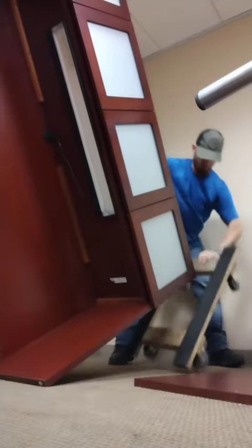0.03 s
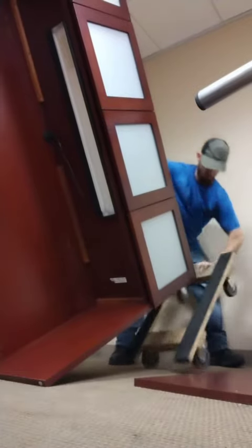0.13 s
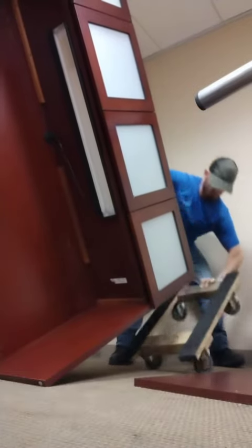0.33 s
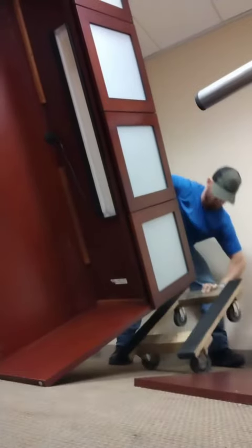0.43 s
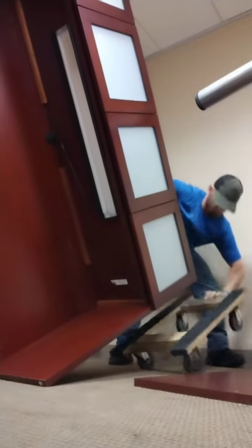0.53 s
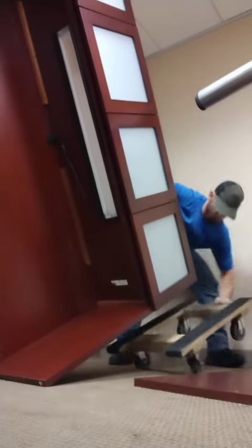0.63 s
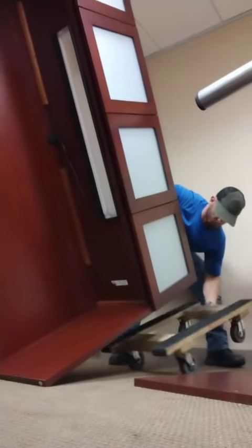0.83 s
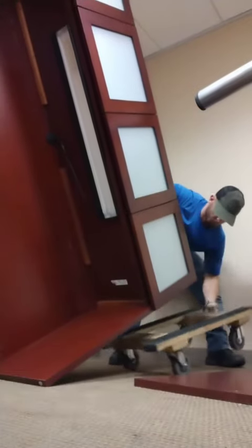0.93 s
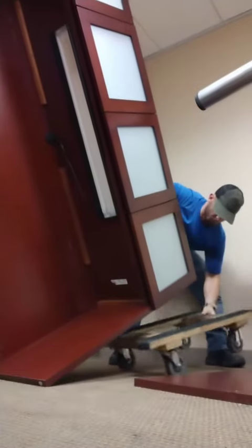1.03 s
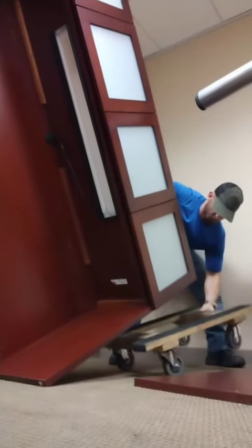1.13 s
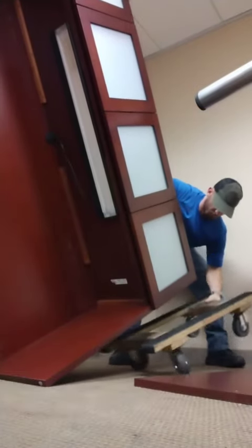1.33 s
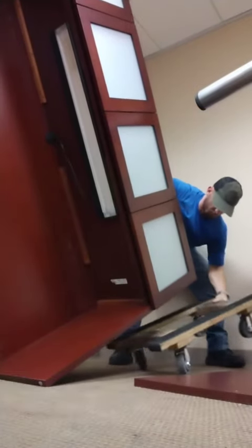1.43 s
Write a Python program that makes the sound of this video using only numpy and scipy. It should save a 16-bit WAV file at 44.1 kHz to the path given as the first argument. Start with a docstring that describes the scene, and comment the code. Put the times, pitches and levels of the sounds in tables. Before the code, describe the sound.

A wooden dolly knocks hollowly against a tall cabinet, ringing its panels and rattling the casters. The wheels land on carpet with soft thumps and a steel click, then scuff faintly, heard from the floor of a quiet office.

```python
"""A carpeted office, heard from one spot on the floor through a single microphone, over quiet ventilation.
A wooden dolly is lowered under a tall wooden cabinet and knocks against it: three hollow blows boom in
the box, ring its panels and shake the casters. The wheels land with soft thumps and a steel click,
then the dolly scuffs over the carpet as it is nudged into place."""
import sys
import numpy as np
from scipy import signal
from scipy.io import wavfile

SR = 44100
rng = np.random.default_rng(int(sys.argv[2]) if len(sys.argv) > 2 else 0)


def wav_record(signal):
    """Record a signal, one row per channel, as 16-bit PCM in the file named by sys.argv[1]."""
    frames = np.transpose(np.atleast_2d(signal))
    bounded = np.clip(frames, -1, 1)
    # unit amplitude maps onto the largest positive 16-bit level
    quanta = np.round(bounded * 32767).astype(np.int16)
    wavfile.write(sys.argv[1], SR, quanta)


N = 66150

# Tone colours of ventilation, carpet friction, wood on wood, a landing wheel, loose parts and steel.
# Each row: frequency in Hz, relative level in dB.
AIR_COLOUR = [(25, -16.5), (60, -2.5), (130, 4.5), (220, -6), (550, -10), (1200, -15), (2000, -19.5),
              (4000, -24), (7500, -28)]
CARPET_COLOUR = [(40, -19.5), (140, 0), (260, -2.5), (550, 4.5), (1100, -2), (1700, -10.5), (2600, -15),
                 (4000, -25), (7500, -37.5)]
WOOD_COLOUR = [(35, -50), (80, -24.5), (120, -16), (160, -2), (215, -9), (300, -16.5), (430, -2), (530, -5),
               (720, 1.5), (1150, 0), (1650, -11.5), (2400, -16), (4000, -29.5), (7500, -52)]
THUMP_COLOUR = [(35, -36), (78, -5.5), (105, -5.5), (135, 0), (220, -3), (420, -2), (800, -20.5),
                (2000, -32.5), (7000, -60)]
RATTLE_COLOUR = [(100, -23.5), (400, -0.5), (900, -2.5), (1650, -6), (2000, -1.5), (2300, 2), (2700, -5),
                 (3200, -12), (4000, -10.5), (4700, -22), (7500, -25)]
STEEL_COLOUR = [(300, -2.5), (1500, -4.5), (3000, -4), (4500, -0.5), (7500, -8.5)]
# The office's reverberation. Each row: frequency in Hz, seconds to fall 60 dB.
ROOM_DECAY = [(70, .6), (200, .54), (500, .48), (1000, .47), (2200, .42), (4000, .28), (7500, .25)]
# Pushes over the carpet. Each row: start, rise and fall in seconds, level in dB, tilt in dB per octave.
CARPET_SCUFFS = [(.03, 0.053, 0.14, -69.5, -0.5), (0.974, 0.029, 0.038, -52, 3),
                 (1.0, .03, 0.19, -69, 13.5), (1.1, .1, .2, -72, -1.5), (1.329, 0.014, 0.11, -62.5, 3),
                 (1.385, 0.035, 0.13, -51.5, -0.5), (1.435, 0.012, 0.058, -53.5, 4)]
# Dolly against cabinet. Each row: start in seconds, level in dB, tilt in dB per octave,
# then boom, panel ring and room in dB, attack in seconds.
WOOD_BLOWS = [(0.1865, 2.5, 0.5, 9, -3, 2.5, 0.0023), (0.2015, -7.5, 3.5, 12, -15.5, 5, 0.00054),
              (0.2328, 18, -2, -10.5, -5, -6.5, 0.0014), (0.2461, 12, 2.5, -1.5, -8.5, -2.5, 0.00033),
              (0.4110, -4, 0, 6.5, 5.5, 9.5, 0.0022), (0.4159, 11, -4.5, -4.5, -4.5, -6.5, 0.00031),
              (0.4250, 2.5, 1, 2.5, -2.5, -4.5, 0.00037), (0.4640, -15, -2, 6.5, 8, 11, 0.0077),
              (0.589, -14.5, -11, -18, 12, 8.5, 0.0049), (0.7658, -14.5, -7.5, -8.5, 4.5, 2.5, 0.00084),
              (0.9666, -22, -7, -8, -11, -10, .003)]
# First reflections off floor, cabinet and wall. Each row: delay at the microphone in seconds, gain.
EARLY_ECHOES = [(.0029, 0.22), (.0060, 0.46), (0.0096, 0.31), (0.014, 0.64)]
# Modes of the cabinet's panels. Each row: frequency in Hz, relative level in dB.
PANEL_MODES = [(153, -7), (178, -9), (214, -6), (398, -7), (439, -5), (616, -2), (694, 0), (772, -1),
               (877, -1), (914, -2), (1027, 0), (1072, 3), (1322, -4), (1392, -2), (1484, -4), (1869, -11)]
# Wheels landing on carpet. Each row: start in seconds, level in dB.
WHEEL_LANDINGS = [(0.207, -14), (0.716, -16.5), (.78, -11.5), (0.826, -16.5), (1.017, -33)]
# Loose dolly parts. Each row: start and length in seconds, level in dB, tilt in dB per octave.
DOLLY_RATTLES = [(0.232, 0.055, -33, 0), (0.443, .075, -28.5, -6), (.55, 0.16, -51.5, -6.5),
                 (.712, 0.054, -39.5, 0.5), (.774, 0.03, -38.5, 10.5)]

PIVOT_HZ, EDGE_HZ = 890, 7650  # tilts turn about the pivot; the treble ends at the edge
ROOM_RISE_S = 0.0049


def amp(db):
    """Decibels to gain."""
    return 10 ** (np.asarray(db) / 20)


def unit(x):
    """Scales to an energy of one."""
    return x / np.sqrt(np.sum(x ** 2) + 1e-20)


def read(points, hz):
    """Reads a table on a log-frequency axis."""
    f, value = np.transpose(points)
    return np.interp(np.log(hz + 1), np.log(f + 1), value)


def add(mix, start_s, sound):
    """Mixes a sound in at a time."""
    part = mix[max(round(start_s * SR), 0):][:len(sound)]
    part += sound[:len(part)]


def cavity(hz, centre_hz=163, width_octaves=.5):
    """Weight 0-1 of the cabinet's low cavity resonance, its boom."""
    return np.exp(-(np.log2((hz + 1) / centre_hz) / width_octaves) ** 2)


def pulse(colour, tilt_db=0, boom_db=0, size=8192):
    """A causal pulse of unit energy with the given colour, tilt and low boom."""
    hz = abs(np.fft.fftfreq(size, 1 / SR))
    octaves = np.log2(np.clip(hz, PIVOT_HZ / 2, EDGE_HZ) / PIVOT_HZ)
    db = read(colour, hz) + tilt_db * octaves + boom_db * cavity(hz)
    minimum_phase = np.exp(np.conj(signal.hilbert(np.log(amp(db)))))
    return unit(np.fft.ifft(minimum_phase).real[:size // 2])


def tail(decays, rise_s):
    """Dense reflections with an even spectrum, each band dying at its own speed."""
    hz, t, bands = signal.stft(rng.standard_normal(SR), SR, nperseg=512)
    for _ in range(4):  # even out the noise's peaks and dips
        even = signal.istft(bands / (abs(bands) + 1e-12), SR, nperseg=512)[1]
        bands = signal.stft(even, SR, nperseg=512)[2]
    fade = amp(-60 * t / read(decays, hz)[:, None])
    reflections = signal.istft(bands * fade, SR, nperseg=512)[1][:SR]
    return unit(reflections * (1 - np.exp(-np.arange(SR) / SR / rise_s)))


def in_room(sound, room_db):
    """The direct sound reaches the microphone, then the office's reverberation."""
    response = amp(room_db) * tail(ROOM_DECAY, ROOM_RISE_S)
    response[0] += 1
    return signal.fftconvolve(sound, response)


def grains(count, per_s, spread_db):
    """Random tiny impacts of uneven strength, rms one."""
    hits = (rng.random(count) < per_s / SR) * rng.choice([-1, 1], count)
    strength = amp(spread_db * rng.standard_normal(count))
    return unit(hits * strength) * np.sqrt(count)


def ventilation(air_db=-68.5, whine_db=-81.5, whine_hz=1262):
    """Room tone: a low rush of air with a faint whine."""
    air = signal.fftconvolve(rng.standard_normal(N + SR), pulse(AIR_COLOUR))[SR:SR + N]
    whine = np.sin(2 * np.pi * whine_hz * np.arange(N) / SR)
    return amp(air_db) * air + amp(whine_db) * whine


def carpet_scuff(rise_s, fall_s, db, tilt_db):
    """Fine friction grains that swell and fade with one push."""
    t = np.arange(0, rise_s + fall_s, 1 / SR)
    push = np.interp(t, [0, rise_s, rise_s + fall_s], [0, 1, 0])
    rub = push * grains(len(t), per_s=3100, spread_db=-1)
    return amp(db) * in_room(signal.fftconvolve(rub, pulse(CARPET_COLOUR, tilt_db)), room_db=-9.5)


def cabinet_blow(db, tilt_db, boom_db, ring_db, room_db, attack_s):
    """A contact pulse, its reflections, the short hollow boom of the box and the ring of its panels."""
    t = np.arange(SR) / SR
    early = np.zeros(SR)
    early[0] = 1
    for delay_s, gain in EARLY_ECHOES:
        early[round(delay_s * SR)] += gain
    box = amp(-1) * tail([(PIVOT_HZ, 0.11)], rise_s=.002)  # all bands fall 60 dB in 0.11 s
    room = amp(room_db) * tail(ROOM_DECAY, ROOM_RISE_S)
    knock = signal.fftconvolve(unit(early) + box + room, pulse(WOOD_COLOUR, tilt_db, boom_db))[:SR]
    panels = amp(ring_db) * panel_ring(t, tilt_db, boom_db)
    return amp(db) * (1 - np.exp(-t / attack_s)) * (knock + panels)


def panel_ring(t, tilt_db, boom_db, pivot_t60_s=0.45, rise_s=.003):
    """Struck panels ring as dying sine waves, the higher modes fading sooner."""
    ring = np.zeros(len(t))
    for hz, mode_db in PANEL_MODES:
        db = mode_db + (1.5 + tilt_db) * np.log2(hz / PIVOT_HZ) + boom_db * cavity(hz)
        t60_s = pivot_t60_s * (hz / PIVOT_HZ) ** -0.18
        ring += amp(db - 60 * t / t60_s) * np.sin(2 * np.pi * (hz * t + rng.random()))
    return unit(ring) * (1 - np.exp(-t / rise_s))


def wheel_thump(db):
    """A wheel lands on the carpet with one soft, low pulse."""
    return amp(db) * in_room(pulse(THUMP_COLOUR), room_db=-0.5)


def dolly_rattle(length_s, db, tilt_db):
    """A burst of small impacts in the dolly's frame and wheels."""
    hits = grains(int(length_s * SR), per_s=1400, spread_db=3)
    return amp(db) * in_room(signal.fftconvolve(hits, pulse(RATTLE_COLOUR, tilt_db)), room_db=-4)


def caster_click(db=-10.5, t60_s=.01):
    """A steel swivel snaps against its stop, and the room answers with equal energy."""
    snap = tail([(PIVOT_HZ, t60_s)], rise_s=.0001)
    room = tail(ROOM_DECAY, ROOM_RISE_S)
    return amp(db) * signal.fftconvolve(snap + room, pulse(STEEL_COLOUR))


def scene():
    """All sources as they reach the microphone's spot on the floor."""
    mix = ventilation()
    for start_s, *blow in WOOD_BLOWS:
        add(mix, start_s, cabinet_blow(*blow))
    add(mix, start_s=.771, sound=caster_click())
    for start_s, db in WHEEL_LANDINGS:
        add(mix, start_s, wheel_thump(db))
    for start_s, *rattle in DOLLY_RATTLES:
        add(mix, start_s, dolly_rattle(*rattle))
    for start_s, *scuff in CARPET_SCUFFS:
        add(mix, start_s, carpet_scuff(*scuff))
    return mix[None]


def record(dry, low_cut_hz=60):
    """The microphone chain rounds peaks near full scale, thins the deep bass and cuts the top treble."""
    rounded = dry / (1 + dry ** 6) ** (1 / 6)
    thinned = signal.sosfilt(signal.butter(3, low_cut_hz, "high", fs=SR, output="sos"), rounded)
    treble_cut = signal.firwin(101, EDGE_HZ, window=("kaiser", 8), fs=SR)
    return signal.oaconvolve(thinned, treble_cut[None], "same")


dry = scene()
out = record(dry)
wav_record(out)
```